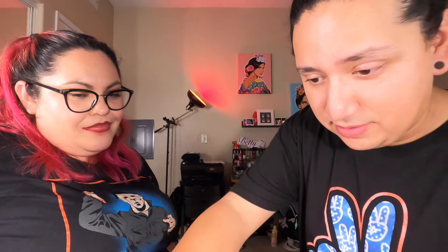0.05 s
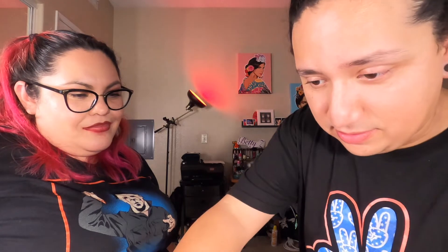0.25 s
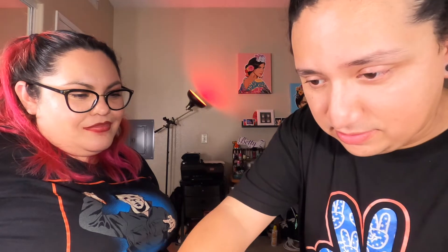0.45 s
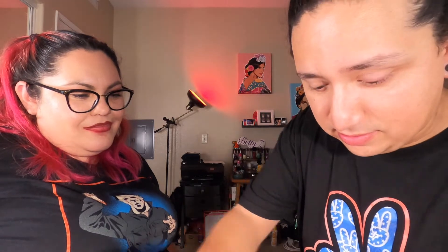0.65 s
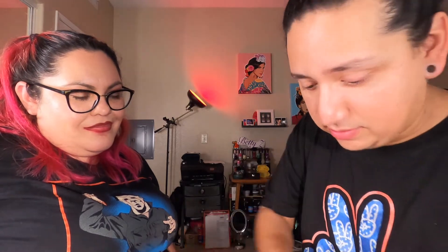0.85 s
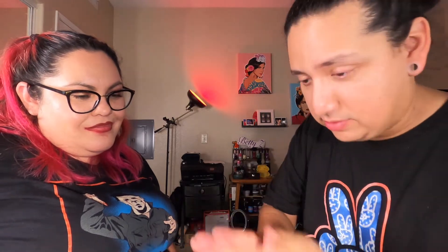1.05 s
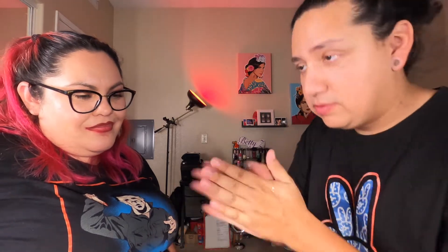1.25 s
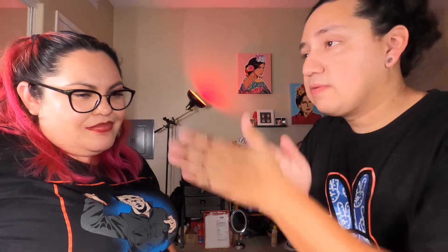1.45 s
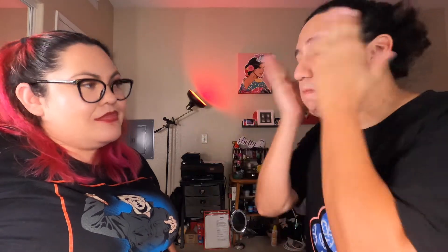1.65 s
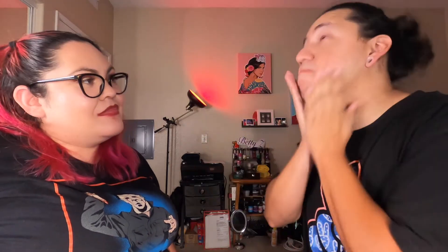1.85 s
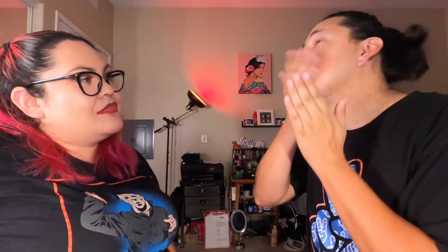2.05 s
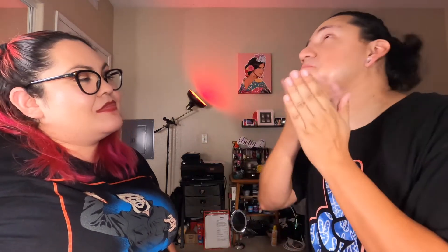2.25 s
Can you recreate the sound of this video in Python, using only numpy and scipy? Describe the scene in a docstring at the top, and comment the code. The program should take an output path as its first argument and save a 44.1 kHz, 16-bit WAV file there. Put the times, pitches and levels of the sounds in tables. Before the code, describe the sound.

A few low knocks on a table, then dry palms rubbing together in a quiet room.

```python
"""Table knocks and dry hands

A quiet furnished room, the microphone standing on a table. Something is set down on that table:
a few low knocks ring its modes until a hand damps them. Then, close by, dry palms rub together
five times and sweep over the cheeks. Slipping skin ridges hiss, and skin that catches lets go
with small ticks. Faint room air lies behind it all."""
import sys
import numpy as np
from scipy import signal
from scipy.fft import rfft, irfft, next_fast_len
from scipy.io import wavfile

SR = 44100
rng = np.random.default_rng(int(sys.argv[2]) if len(sys.argv) > 2 else 0)


def store_pcm(level_fs):
    """Save levels as 16-bit WAV."""
    pcm = np.round(np.clip(level_fs, -1, 1) * 32767).astype(np.int16)
    wavfile.write(sys.argv[1], SR, np.atleast_2d(pcm).T)


N = 101429
TIME = np.arange(N) / SR

# spectrum of the room air: frequency_hz, density_db
AIR_SPECTRUM = [(25, -14.5), (60, -16), (95, -21.5), (125, -7), (165, -0.5), (260, -4.5), (480, -11),
                (700, -4.5), (950, -3.5), (1200, -0.5), (1600, -6.5), (2600, -10.5), (3800, -19.5),
                (5600, -23), (7500, -32.5), (10500, -34.5), (13000, -45.5), (15000, -55)]
# decay of the furnished room: frequency_hz, t60_s
ROOM_DECAY = [(100, 0.27), (200, 0.5), (300, 0.35), (600, 0.23), (1200, 0.62), (4000, 0.51), (12000, 0.36)]
# skin catching: start_s, level_db, pitch_hz, t60_s, snap_db
SKIN_TICKS = [(1.015, -24.5, 1510, 0.0062, -4), (1.116, -25, 2880, 0.0067, -22),
              (1.169, -30.5, 3950, 0.013, -24), (1.2657, -24.5, 2600, 0.0049, -8),
              (1.272, -23, 2680, 0.0072, -11), (1.397, -35, 3200, 0.0044, -23),
              (1.7349, -31, 2420, 0.0052, 3.5)]
# palm against palm: peak_s, level_db, rise_s, fall_s, tilt_db_per_octave, hollow_hz, hollow_db
PALM_STROKES = [(0.846, -60.5, 0.0033, 0.06, 8.5, 6700, 1), (0.902, -42.5, 0.015, 0.027, -0.1, 2160, 0),
                (0.934, -51, 0.007, 0.012, 3, 1680, -5), (1.062, -44, 0.051, 0.026, 0, 4400, -7.5),
                (1.174, -45, 0.04, 0.028, 0.5, 3700, -14), (1.288, -39.5, .016, 0.024, 2.5, 5100, -5),
                (1.317, -41, 0.013, 0.016, 2, 2400, -7.5), (1.404, -40.5, 0.012, 0.0054, 0.5, 1850, -5),
                (1.432, -42.5, 0.028, 0.023, 3, 3230, -2)]
# palm against cheek: same columns
CHEEK_STROKES = [(1.745, -51.5, 0.014, 0.016, 0.18, 2180, -6), (1.83, -49.5, 0.04, 0.051, 0.51, 3080, -5),
                 (1.877, -49, 0.01, 0.038, -0.62, 2250, -4.5), (2.178, -55, .035, 0.028, 0.25, 5000, -4)]
# friction spectra of palm on palm and palm on cheek: frequency_hz, density_db
PALM_SPECTRUM = [(100, -41), (180, -10), (500, -11.5), (1000, -10.5), (1700, 2.5), (3000, -0.5), (4600, 2),
                 (7000, -6.5), (8500, -11.5), (11000, -16), (13000, -30), (15000, -45)]
CHEEK_SPECTRUM = [(100, -28), (170, 3), (300, -3), (800, -13), (1300, 4), (3000, 2.5), (4500, -1.5),
                  (7000, -7), (8500, -14), (11000, -14), (15000, -40)]
# knocks on the table: start_s, level_db, low_cut_hz, high_cut_hz, rattle_db, damping_db_per_s
KNOCKS = [(0.2054, -16.5, 200, 2170, 0.5, 0.5), (0.2139, -12.5, 70, 350, -5, 8),
          (0.282, -30, 90, 1730, 4.5, 52.5), (0.3684, -9.5, 520, 816, -2, 227),
          (0.378, -11.5, 217, 600, -15, 123), (0.386, -26.5, 97, 2150, 6, 20),
          (0.468, -18.5, 310, 674, -3.5, 94), (0.476, -21, 266, 490, -7, 37),
          (0.509, -27.5, 151, 316, 4, 4)]
# modes of the table under the microphone: pitch_hz, level_db, t60_s
TABLE_MODES = [(119.5, 1.5, 0.48), (163.3, -3.5, 0.45), (195.5, -17, 0.87), (224.5, -3, 0.052),
               (271.8, -5, .7), (306.2, -8, 0.62), (330.5, -6, .25), (436, -11.5, 0.44), (572, -13.5, 0.37),
               (645, -11.5, .3), (726.5, -16.5, 0.54), (750, -16, 0.0404), (803, -17.5, .3),
               (867, -27.5, .35), (949, -20, 0.82), (1330, -20.5, 0.34), (1790, -25, 0.29),
               (2480, -50, 0.32)]
# dense, short response of the table and the things on it: frequency_hz, density_db
RATTLE_SPECTRUM = [(40, -30), (110, 1.5), (300, 0.5), (480, -9.5), (720, -3), (1100, -18.5), (2300, -20),
                   (3200, -26.5), (4500, -30), (7000, -38.5), (14000, -37.5)]
# light clinks of the object set down: start_s, level_db, pitch_hz, t60_s
CLINKS = [(0.216, -47.5, 4070, .13), (0.225, -41, 3960, 0.091), (0.566, -44, 2950, 0.04)]


def amp(db):
    """Decibels to gain."""
    return 10 ** (np.asarray(db) / 20)


def unit(x):
    """Scales to rms 1."""
    return x / np.sqrt(np.mean(x ** 2) + 1e-20)


def read(points, hz):
    """Reads a table on a log-frequency axis."""
    points_hz, values = np.transpose(points)
    return np.interp(np.log(hz + 1), np.log(points_hz + 1), values)


def colour(x, spectrum):
    """Gives x a spectrum, at rms 1."""
    size = next_fast_len(len(x))
    gain = amp(read(spectrum, np.fft.rfftfreq(size, 1 / SR)))
    return unit(irfft(rfft(x, size) * gain, size)[:len(x)])


def cut(x, hz, kind, order=2):
    """Low-pass or high-pass."""
    return signal.sosfilt(signal.butter(order, hz, kind, fs=SR, output="sos"), x)


def add(mix, start_s, sound):
    """Mixes a sound in at start_s."""
    part = mix[round(start_s * SR):][:len(sound)]
    part += sound[:len(part)]


def resonate(x, hz, width_hz):
    """A steep-sided resonance that follows the curve hz."""
    carrier = np.exp(2j * np.pi * np.cumsum(hz) / SR)
    pole = np.exp(-np.pi * width_hz / SR)
    return (carrier * signal.lfilter([(1 - pole) ** 2], [1, -2 * pole, pole ** 2], x / carrier)).real


def room_air(level_db=-58.5):
    """Steady, faint noise of the air around the microphone."""
    return amp(level_db) * colour(rng.standard_normal(N), AIR_SPECTRUM)


def room_reverb(x, delay_s=0.0084):
    """A diffuse tail reaches the microphone after the direct sound; each band dies at its own rate."""
    hz, t, bands = signal.stft(rng.standard_normal(SR // 2), SR, nperseg=256)
    decay = amp(-60 * t / read(ROOM_DECAY, hz)[:, None])
    tail = signal.istft(bands * decay, SR)[1]
    tail *= TIME[:len(tail)] > delay_s
    return signal.fftconvolve(x, tail / np.linalg.norm(tail))[:N]


def skin_ticks(rise_s=0.00047):
    """Skin sticks and lets go: a soft snap and a few cycles of a small air pocket."""
    out, t = np.zeros(N), TIME[:SR // 20]
    for start_s, db, hz, t60, snap_db in SKIN_TICKS:
        snap = amp(snap_db) * unit(cut(rng.standard_normal(len(t)), 2.54 * hz, "low", order=3))
        pocket = np.sin(2 * np.pi * hz * t)
        envelope = amp(db - 60 * t / t60) * (1 - np.exp(-t / rise_s))
        add(out, start_s, cut(envelope * (pocket + snap), 0.31 * hz, "high"))
    return out


def rubbing(strokes, spectrum):
    """Skin ridges slip in dense grains as a stroke swells and slows; the hollow of the hand resonates."""
    grain_db, grip_db, grip_cutoff_hz = 3.5, 1.56, 222  # spread of slip sizes, unevenness of grip
    hollow_q, glide_octaves_per_s = 2.54, -6  # the gap between the hands opens during a stroke
    roundness = 0.45  # of the stroke's peak
    out, t = np.zeros(N), TIME[:SR // 2] - 0.25  # t is zero at the fastest slide
    for peak_s, db, rise_s, fall_s, tilt, hollow_hz, hollow_db in strokes:
        slips, sizes, grip = rng.standard_normal((3, len(t)))
        grip = unit(cut(grip, grip_cutoff_hz, "low"))
        grains = slips * amp(grain_db * sizes + grip_db * grip)
        hiss = colour(grains, [(hz, level + tilt * np.log2(hz / hollow_hz)) for hz, level in spectrum])
        friction = colour(rng.standard_normal(len(t)), spectrum)
        glide_hz = hollow_hz * 2 ** (glide_octaves_per_s * t)
        hollow = unit(resonate(friction, glide_hz, hollow_hz / hollow_q))
        speed = np.exp(roundness - np.hypot(roundness, t / np.where(t < 0, rise_s, fall_s)))
        add(out, peak_s + t[0], amp(db) * speed * (hiss + amp(hollow_db) * hollow))
    return out


def table_knocks(hand_rests_s=0.54, hand_db_per_s=221):
    """Each knock rings the same modes and a dense rattle; hardness and place of contact set its band."""
    rattle_t60_s, linger_t60_s = 0.082, 0.49
    out, t = np.zeros(N), TIME[:SR]
    ring = sum(amp(db - 60 * t / t60) * np.sin(2 * np.pi * hz * t) for hz, db, t60 in TABLE_MODES)
    rattle_decay = amp(-1 - 60 * t / rattle_t60_s) + amp(-8.5 - 60 * t / linger_t60_s)
    for start_s, db, low_cut_hz, high_cut_hz, rattle_db, damping in KNOCKS:
        rattle = amp(rattle_db) * rattle_decay * colour(rng.standard_normal(len(t)), RATTLE_SPECTRUM)
        knock = cut(cut(ring / 2 + rattle, low_cut_hz, "high"), high_cut_hz, "low")
        add(out, start_s, amp(db - damping * t) * knock)
    for start_s, db, hz, t60 in CLINKS:
        add(out, start_s, amp(db - 60 * t / t60) * np.sin(2 * np.pi * hz * t))
    radiated = cut(out, hz=86.4, kind="high", order=4)  # the table gives off little deep bass
    hand_damping = amp(-hand_db_per_s * np.maximum(TIME - hand_rests_s, 0))
    return radiated * hand_damping


def scene():
    """Table and hands close to one microphone, with a little of the room behind them."""
    knocks = table_knocks()
    hands = rubbing(PALM_STROKES, PALM_SPECTRUM) + rubbing(CHEEK_STROKES, CHEEK_SPECTRUM) + skin_ticks()
    air = room_air()
    reverb = room_reverb(amp(-12) * hands + amp(-11.5) * knocks)
    return (knocks + hands + air + reverb)[None]


def record(dry):
    """The recorder behind the microphone cuts the highest treble steeply."""
    edge_hz = 15200
    low_pass = signal.firwin(511, edge_hz, window=("kaiser", 9), fs=SR)
    return signal.oaconvolve(dry, low_pass[None], "same")


dry = scene()
out = record(dry)
store_pcm(out)
```